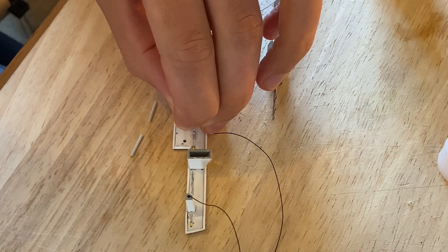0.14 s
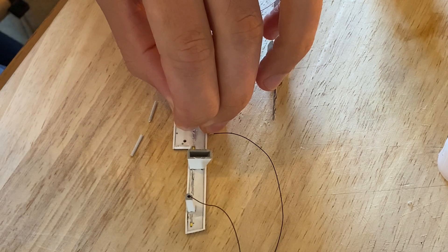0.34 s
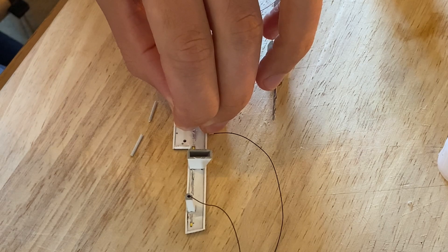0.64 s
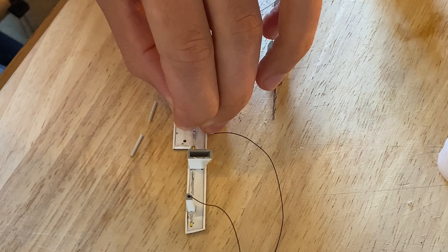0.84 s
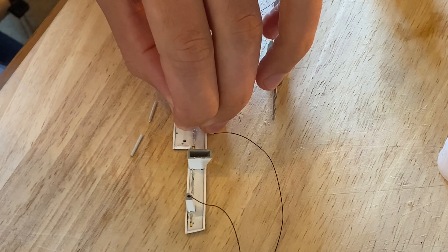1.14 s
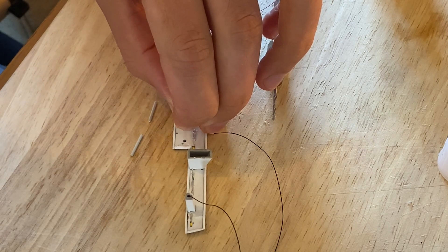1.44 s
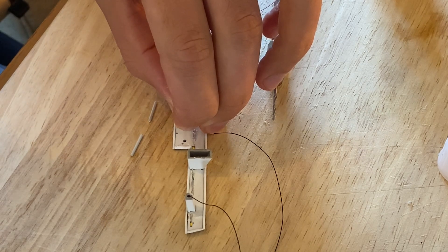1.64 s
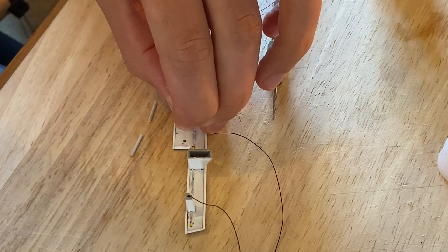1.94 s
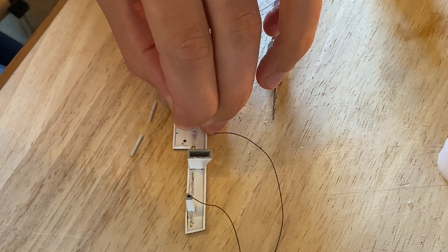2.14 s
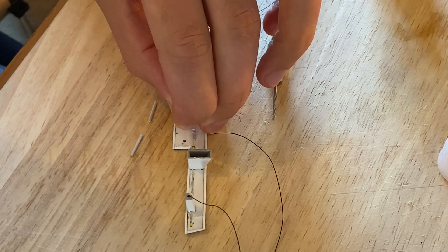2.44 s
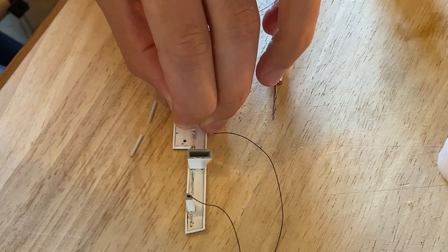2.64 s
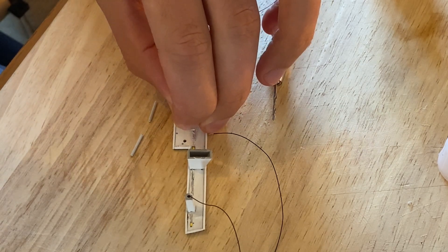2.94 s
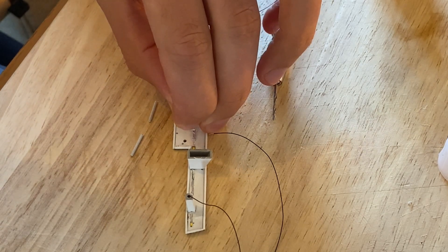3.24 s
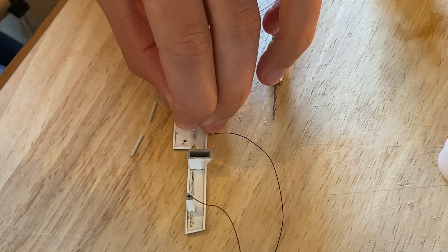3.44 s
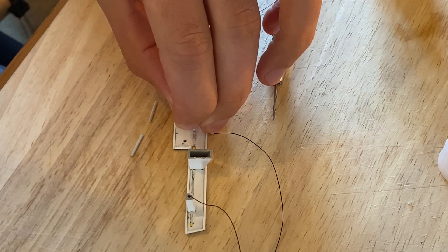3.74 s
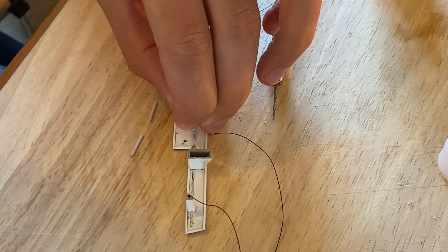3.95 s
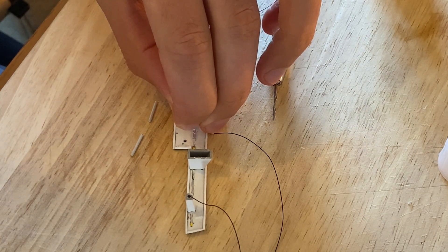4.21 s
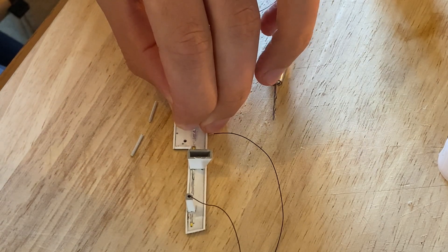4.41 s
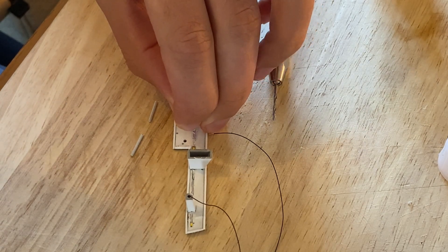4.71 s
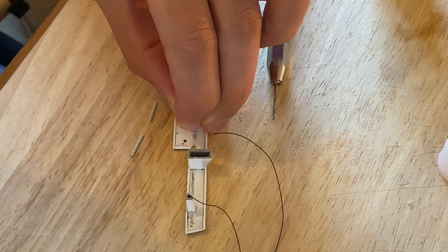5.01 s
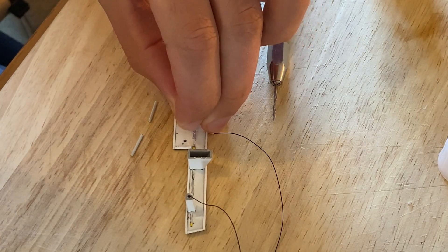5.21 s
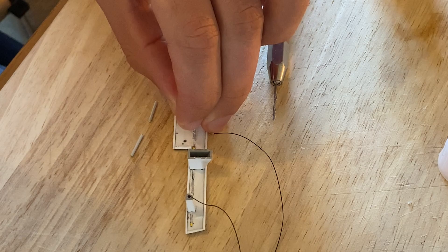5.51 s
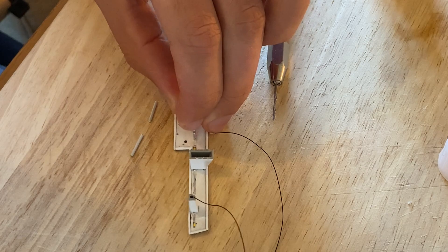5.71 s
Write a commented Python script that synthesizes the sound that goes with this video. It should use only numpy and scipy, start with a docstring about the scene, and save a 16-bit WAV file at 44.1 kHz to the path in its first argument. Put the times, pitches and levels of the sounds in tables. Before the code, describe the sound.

A close stereo microphone hears light finger rustle, a short spurt, a creaky pump stroke and a fuller bright spray, then dry plastic clicks. After a pause, a loud woody thud booms through the table, followed by a weaker dull bump and faint jingling. Slow regular ticking continues in the background of the quiet room, with tiny clicks near the end and a bassy rumble rising outside.

```python
"""A quiet room, close over a wooden table: a pump bottle is handled and squirted, then set down hard.
Fingers, jet and piston are shaped noise; snaps and clicks are short rings with treble flashes. The blows
ring the table's modes under a falling wave front, and small metal parts jingle. Across the room a pendulum
clock ticks through its case. Outdoors a low rumble swells at the end. Two close microphone ports hear it."""
import sys
import numpy as np
from scipy import signal
from scipy.fft import rfft, irfft, next_fast_len
from scipy.io import wavfile

SR = 44100
rng = np.random.default_rng(int(sys.argv[2]) if len(sys.argv) > 2 else 0)


def unload_wav(signal):
    """Save mono or channel-first audio to the path in sys.argv[1] as 16-bit WAV at rate SR, clipped to [-1, 1]."""
    wavfile.write(
        sys.argv[1],
        SR,
        np.round(np.clip(np.atleast_2d(signal).T, -1, 1) * 32767).astype(np.int16),
    )


N = 258867  # samples

# Levels are relative: sources add their own trim. Colours are noise spectra: f/Hz, level/dB per Hz.
# room tone
AIR_COLOUR = [(13, -42), (22, -15), (49, -5.5), (70, -4), (250, -15), (310, -18), (441, -24), (563, -27),
              (737, -30.5), (821, -32), (1080, -34.5), (2230, -40), (6230, -48), (12600, -52), (14000, -68)]
AIR_DB = -64

# fingers sliding on the bottle: start t/s, end t/s, rustle level/dB, growth/dB per s
SLIDES = [(0.126, .168, -63.5, 190), (0.441, .478, -72.5, -30), (0.633, .705, -72, 250),
          (1.636, 1.792, -77, -10), (2.218, 2.31, -85.5, 71)]
SLIDE_COLOUR = [(1760, -61), (3000, -32), (4110, -21), (4430, -18), (6330, -7), (7540, -12.5), (8250, -8.5),
                (10500, -4.5), (11900, -1), (13200, -19.5), (15900, -5.5)]
# resonances of the bottle wall woken by the fingers: f/Hz, width/Hz, level/dB
BOTTLE_WALL = [(6250, 450, -9), (8250, 350, -9), (11850, 350, -5)]
SLIDE_RISE_DB_PER_S, SLIDE_FALL_DB_PER_S = 1400, 752

# clock escapement, across the room: t/s, level/dB
TICKS = [(0.2402, -48.5), (0.8802, -53), (1.4794, -50.5), (2.1052, -52.5), (2.713, -52), (3.3407, -53.5),
         (3.9444, -52.5), (4.572, -55), (5.1767, -52.5), (5.808, -55)]
TICK_COLOUR = [(88, -37.5), (150, 1), (404, -11), (708, -15.5), (766, -26), (1060, -16), (1220, -20.5),
               (1320, -6.5), (1510, -24), (2860, -14.5), (4390, -41), (4930, -25), (8170, -34.5),
               (11100, -19.5), (12800, -31), (15500, -45.5)]
# case resonances on the tick, then on the tock: f/Hz, width/Hz, level/dB
TICK_CASE = [(2240, 240, -4), (2800, 130, -1.5), (6483, 100, -23), (11300, 260, -15)]
TOCK_CASE = [(2100, 300, -9.5), (2585, 300, -0.5), (4990, 300, -22.5), (9660, 190, -7), (11217, 260, -16)]
# decay of the tick in the room: f/Hz, t60/s
TICK_DYING = [(150, 0.31), (800, 0.2), (1800, 0.16), (3600, .2), (6000, 0.12), (12000, .12)]

# squirts: nozzle opens t/s, shuts t/s, hiss level/dB, dribble level/dB
SQUIRTS = [(0.696, 0.746, -51.5, -64.5), (1.143, 1.319, -37, -59)]
JET_COLOUR = [(180, -41), (300, -13.5), (528, -12.5), (634, -1), (773, -4.5), (1690, -12), (1900, -3),
              (2830, -7.5), (3070, -4), (3810, -8.5), (6700, -6.5), (7530, -12.5), (9500, -1.5),
              (11600, -1), (15900, -25)]
OPENING, CLOSING = 0.16, 0.28  # shares of a squirt spent opening and closing
DRIBBLE_S, DRIBBLE_FALL_DB_PER_S = 0.027, 349  # a little still leaves the nozzle afterwards
LEAK_DB = -9.5  # a little mist leaks with the creak

# loud slips of the piston in its barrel: t/s, level/dB
SLIPS = [(0.7017, -42.5), (0.7088, -37), (0.7173, -39.5), (0.734, -40), (0.751, -42), (0.9989, -46),
         (1.03, -45.5), (1.040, -37.5), (1.067, -49), (1.0854, -48.5), (1.126, -51), (1.1366, -35.5)]
SLIP_COLOUR = [(240, -21), (400, -0.5), (825, -2.5), (1700, -13), (2110, 12.5), (2620, -7), (3410, -17.5),
               (3850, -22.5), (4710, 11), (6710, -4), (7590, -13.5), (11500, 4.5), (15900, -21)]
# piston strokes: start t/s, end t/s, creak level/dB, growth/dB per s
STROKES = [(0.703, 0.743, -60.5, 0.5), (0.994, 1.148, -58, 15.5)]
CREAK_COLOUR = [(180, -37), (300, -20.5), (478, -4), (826, 0.5), (2170, -4.5), (3870, -20), (4730, -4.5),
                (6930, -9.5), (7910, -17), (11600, -14), (15900, -22.5)]
STROKE_RISE_DB_PER_S, STROKE_FALL_DB_PER_S = 1402, 900

# small snaps and clicks close by, some from the pump head: t/s, level/dB, ring f/Hz, treble level/dB
SNAPS = [(.774, -43, 950, -76), (0.784, -44.5, 890, -80), (1.346, -38, 2550, -70), (1.35, -38.5, 2750, -65),
         (1.44, -58.5, 4750, -82), (1.567, -40, 2790, -54), (1.848, -44.5, 2690, -54.5),
         (2.299, -69.5, 6200, -70), (4.881, -64.5, 9000, -68.5), (4.885, -66.5, 7030, -62.5),
         (4.898, -60.5, 5070, -54), (4.946, -77.5, 7000, -69), (5.375, -57, 914, -88),
         (5.477, -45.5, 1360, -95)]

# faint table rumble under the moving arm: loudest at t/s, level/dB
HANDLING = [(1.23, -57), (1.46, -58)]
HANDLING_RISE_DB_PER_S, HANDLING_FALL_DB_PER_S = 50, 98.5

# the bottle meets the table: t/s, blow level/dB, low-cut f/Hz, high-cut f/Hz, scatter level/dB,
# crack level/dB, starting f/Hz of the wave front
BLOWS = [(2.789, -16.5, 40, 14000, -11, -33, 1100), (2.9906, -26.5, 230.6, 675, -28, -69, 900)]
# modes of the wooden table: f/Hz, level/dB, t60/s
TABLE_MODES = [(47.53, -28, 0.63), (123.2, -4, 0.35), (169.5, -8.5, 0.42), (211, -9, .15),
               (250.4, -6.5, 0.19), (311.2, -5, 0.14), (351, -10, 0.22), (454.6, -4.5, 0.15),
               (600, -6, 0.1), (734, -14.5, 0.1), (953, -16, 0.1011), (1097, -9, 0.11),
               (1260, -12.5, 0.046), (1424, -17, .08), (1615, -17, 0.078), (2595, -2.5, 0.028),
               (5990, -21, 0.1)]
SCATTER_COLOUR = [(35, -45), (60, -18), (130, -9.5), (346, -11), (539, -20.5), (649, -15), (1110, -23.5),
                  (1370, -17.5), (1500, -18.5), (5960, -40.5), (11500, -58), (15900, -80)]
# decay of the scatter in the room: f/Hz, t60/s
SCATTER_DYING = [(80, 0.57), (210, 0.36), (560, 0.3), (1470, 0.22), (3880, 0.2), (10200, 0.16)]
BENDING_S = 0.003  # delay of a 400 Hz bending wave behind the first arrival
# wave front: time to half pitch, decay, level over the blow
FRONT_FALL_S, FRONT_T60_S, FRONT_DB = 0.0028, 0.034, 19.5

# metal parts shaken by the blows: t/s, jingle level/dB
RATTLES = [(2.996, -83), (3.068, -85), (3.147, -72.5)]
# ringing of the metal: f/Hz, level/dB, t60/s
METAL = [(2796, -13, 0.1), (5060, -1, 0.058), (6150, -10, 0.094), (6300, -8, 0.083), (7400, -12, .05),
         (8140, -7, .08), (10300, -5, 0.046), (11440, -16, 0.083), (12530, -11, .05)]
# one loose part that keeps buzzing: f/Hz, width/Hz, level/dB
LOOSE_PART = [(3860, 250, 0.5)]
RATTLE_RISE_DB_PER_S, RATTLE_FALL_DB_PER_S = 1096, 300
BUZZ_S, BUZZ_DB, BUZZ_FALL_DB_PER_S = 2.92, -72.5, 38

# rumble from outdoors: t/s, bass level/dB
RUMBLE = [(4.9, -77.5), (5.15, -69), (5.25, -59.5), (5.45, -57.5), (5.6, -53), (5.87, -52.5)]
RUMBLE_LOW_COLOUR = [(24, -26.5), (40, -4.5), (118, -2), (145, 1.5), (246, -9), (286, -1), (329, -9.5),
                     (607, -12), (800, -25), (1040, -27), (1760, -120)]
RUMBLE_UPPER_COLOUR = [(290, -34), (500, -29.5), (629, -34.5), (777, -14), (909, -24), (3170, -34),
                       (4500, -50.5), (5850, -77), (9900, -120)]
UPPER_S, UPPER_DB, UPPER_RISE_DB_PER_S = 5.76, -62, 244  # its upper part comes last

# gain of the side signal between the microphone ports: f/Hz, level/dB
WIDTH = [(60, -15.5), (92, -7.5), (140, -12), (210, -11.5), (330, -7), (500, -6), (770, -0.5), (1170, -1),
         (1790, -13.5), (2740, -22), (4190, -13), (6410, 1.5), (9810, 1.5), (15000, -14)]
CUTOFF_HZ = 15900

FLOOR = 1e-18  # inaudible, keeps filter inputs from being exactly zero


def from_db(db):
    """Decibels to gain."""
    return 10 ** (np.asarray(db) / 20)


def rms_one(x):
    """Scale to rms 1."""
    return x / np.sqrt(np.mean(x ** 2) + 1e-20)


def at_hz(points, hz):
    """Read a table on a log-frequency axis."""
    table_hz, values = np.array(points)[:, 0], np.array(points)[:, 1]
    return np.interp(np.log(hz), np.log(table_hz), values)


def gain_curve(rows):
    """A (t/s, level/dB) table as a gain, silent outside the table."""
    s, db = np.transpose(rows)
    return from_db(np.interp(np.arange(N) / SR, s, db, left=-200, right=-200))


def swell(start, stop, db, rise_db_per_s, fall_db_per_s, growth_db_per_s=0):
    """Gain that climbs to db at start, drifts until stop, then falls."""
    t = np.arange(N) / SR
    growth = growth_db_per_s * (np.clip(t, start, stop) - start)
    rise = rise_db_per_s * np.maximum(start - t, 0)
    fall = fall_db_per_s * np.maximum(t - stop, 0)
    return from_db(db + growth - rise - fall)


def clicks(times, db):
    """Single samples at given times."""
    out = np.full(N, FLOOR)
    out[np.round(np.array(times) * SR).astype(int)] = from_db(db)
    return out


def drift(rate):
    """Slow chance: straight lines between random knots of spread 1, two knots per 1/rate seconds."""
    knots = np.arange(0, N / SR + 1 / rate, 0.5 / rate)
    return np.interp(np.arange(N) / SR, knots, rng.standard_normal(len(knots)))


def coloured(spectrum):
    """Steady noise of a given spectrum, rms 1."""
    size = next_fast_len(N, True)
    hz = np.maximum(np.arange(size // 2 + 1) * SR / size, 1)
    white = rfft(rng.standard_normal(size))
    return rms_one(irfft(white * from_db(at_hz(spectrum, hz)), size)[:N])


def fading(hits, t60, rise_s):
    """Envelope of height about 1 per unit click: a short swell, then an exponential fall."""
    lag = np.exp(-1 / (rise_s * SR))
    fall = signal.lfilter([1], [1, -from_db(-60 / (t60 * SR))], hits)
    return signal.lfilter([1 - lag], [1, -lag], fall)


def ring(x, hz, t60):
    """A unit click sets a decaying sine of height 1 ringing."""
    r, w = from_db(-60 / (t60 * SR)), 2 * np.pi * hz / SR
    return signal.lfilter([0, np.sin(w)], [1, -2 * r * np.cos(w), r * r], x)


def resonant_noise(peaks):
    """Noise heard through (f/Hz, width/Hz, level/dB) resonances."""
    out = 0
    for hz, width, db in peaks:
        t60 = np.log(1000) / np.pi / width
        out = out + from_db(db) * rms_one(ring(rng.standard_normal(N), hz, t60))
    return out


def dying_noise(noise, hits, dying, rise_cycles):
    """Octave bands of noise after each hit: lows start later, each band fades at its own pace."""
    out, edges = 0, 40 * 2. ** np.arange(10)
    for low, high in zip(edges, edges[1:]):
        hz = np.sqrt(low * high)
        band = signal.sosfilt(signal.butter(2, [low, high], "band", fs=SR, output="sos"), noise)
        out = out + band * fading(hits, at_hz(dying, hz), 0.00027 + rise_cycles / hz)
    return out


def room_tone():
    """Steady noise of the quiet room, wavering slowly in level."""
    return from_db(AIR_DB + 1.2 * drift(6)) * coloured(AIR_COLOUR)


def fingers():
    """Skin sliding on the bottle rustles and wakes resonances of its wall."""
    slide = sum(swell(a, b, db, SLIDE_RISE_DB_PER_S, SLIDE_FALL_DB_PER_S, growth)
                for a, b, db, growth in SLIDES)
    rustle = from_db(-3) * coloured(SLIDE_COLOUR) + resonant_noise(BOTTLE_WALL)
    return slide * rustle * from_db(1.3 * drift(120))


def clock():
    """Far ticks arrive mostly as room sound, through case resonances that differ from tick to tock."""
    s, db = np.transpose(TICKS)
    tock = np.searchsorted(s, np.arange(N) / SR, "right") % 2 == 0
    case = np.where(tock, resonant_noise(TOCK_CASE), resonant_noise(TICK_CASE))
    return dying_noise(coloured(TICK_COLOUR) + case, clicks(s, db + 1), TICK_DYING, rise_cycles=6.1)


def stroke_gain():
    """Level of the piston's creak."""
    return sum(swell(a, b, db, STROKE_RISE_DB_PER_S, STROKE_FALL_DB_PER_S, growth)
               for a, b, db, growth in STROKES)


def jet():
    """Liquid forced through the nozzle: smooth bright noise that sputters a little."""
    t = np.arange(N) / SR
    flow = from_db(LEAK_DB) * stroke_gain()
    for a, b, db, dribble_db in SQUIRTS:
        opening = np.minimum((t - a) / OPENING, (b - t) / CLOSING) / (b - a)
        flow = flow + from_db(db) * np.clip(opening, 0, 1)
        flow = flow + (t > a) * swell(a, b + DRIBBLE_S, dribble_db, 0, DRIBBLE_FALL_DB_PER_S)
    return flow * coloured(JET_COLOUR) * from_db(1.2 * drift(120))


def piston():
    """The piston slips in its barrel: loud puffs of noise a few ms long over a creak of many small ones."""
    s, db = np.transpose(SLIPS)
    slips = coloured(SLIP_COLOUR) * fading(clicks(s, db), 0.014, 0.0005)
    creak = stroke_gain()
    small = (rng.random(N) < 300 / SR) * rng.exponential(1, N) * creak  # about 300 per second
    grain = from_db(1.5) * fading(small + FLOOR, 0.0051, 0.00036)
    return slips + coloured(CREAK_COLOUR) * (grain + from_db(-7.5) * creak)


def snaps():
    """Each snap or click is a short ring with a flash in the treble."""
    out = np.zeros(N)
    bright, broad = coloured(SLIDE_COLOUR), coloured(CREAK_COLOUR)
    hit = np.append(1., np.full(SR // 4, FLOOR))
    for s, db, hz, treble_db in SNAPS:
        span = slice(round(s * SR), round(s * SR) + len(hit))
        knock = ring(hit, hz, 0.018)
        knock += from_db(-9.5) * ring(hit, 1.64 * hz, 0.013)
        knock += from_db(-17.5) * ring(hit, 0.52 * hz, 0.0092)
        knock += 0.26 * broad[span] * fading(hit, 0.0061, 0.00024)
        echo = from_db(-5.5) * rng.standard_normal(len(hit)) * fading(hit, 0.2, 0.00079)
        knock += 0.13 * ring(echo, hz, 0.00213)
        flash = fading(hit, 0.012, 0.00082) + from_db(-20.0) * fading(hit, 0.11, 0.0023)
        out[span] += from_db(db - 3.5) * knock + from_db(treble_db + 0.5) * bright[span] * flash
    return out


def arm_on_table(low):
    """The table rumbles faintly under the moving arm: bass noise, low-passed."""
    arm = sum(swell(s, s, db, HANDLING_RISE_DB_PER_S, HANDLING_FALL_DB_PER_S) for s, db in HANDLING)
    return arm * signal.lfilter(*signal.butter(2, 300, fs=SR), low)


def wave_front(s, db, front_hz):
    """A bending wave spreads highs first, so its front falls in pitch."""
    t = np.maximum(np.arange(N) / SR - s, 0)
    falling = np.sin(2 * np.pi * front_hz * FRONT_FALL_S * np.log(1 + t / FRONT_FALL_S))
    return from_db(db + FRONT_DB - 60 * t / FRONT_T60_S) * (1 - np.exp(-t / 0.0038)) * falling


def set_down():
    """Each blow sends out a wave front and sets the table modes ringing; the room scatters it."""
    out, bright = 0, coloured(SLIDE_COLOUR)
    for s, db, soft_hz, hard_hz, scatter_db, crack_db, front_hz in BLOWS:
        scatter = dying_noise(coloured(SCATTER_COLOUR), clicks([s], scatter_db), SCATTER_DYING,
                              rise_cycles=0.87)
        body = wave_front(s, db, front_hz)
        for k, (hz, level_db, t60) in enumerate(TABLE_MODES):
            arrival = clicks([s + BENDING_S * np.sqrt(400 / hz)], db + level_db)
            build_up = ring(arrival, hz, 6.0 / hz) * 3 * hz / SR  # over a cycle or two
            body = body + (-1) ** k * ring(build_up, hz, t60)
        contact = signal.butter(1, hard_hz, fs=SR)  # a soft blow hardly wakes the high modes
        body = signal.lfilter(*contact, signal.lfilter(*contact, body) + scatter)
        out = out + signal.sosfilt(signal.butter(4, soft_hz, "high", fs=SR, output="sos"), body)
        crack = fading(clicks([s], crack_db), 0.025, 0.00038)
        crack += fading(clicks([s], crack_db - 15), 0.079, 0.0029)
        out = out + bright * crack
    s, db = BLOWS[0][:2]
    # the room keeps the bass of the first blow longest
    return out + coloured(RUMBLE_LOW_COLOUR) * fading(clicks([s], db - 24.5), 0.95, 0.02)


def jingle():
    """Tiny uneven contacts: a dry rattle, the ringing of the metal and one buzzing loose part."""
    shake = sum(swell(s, s, db, RATTLE_RISE_DB_PER_S, RATTLE_FALL_DB_PER_S) for s, db in RATTLES)
    rings = 0
    for hz, db, t60 in METAL:
        touches = (rng.random(N) < 500 / SR) * rng.standard_normal(N) * shake  # about 500 per second
        rings = rings + from_db(db + 2.5) * ring(touches + FLOOR, hz, t60)
    buzz = swell(BUZZ_S, BUZZ_S, BUZZ_DB, RATTLE_RISE_DB_PER_S, BUZZ_FALL_DB_PER_S)
    rattle = from_db(9) * shake * coloured(SLIDE_COLOUR)
    return rings + buzz * resonant_noise(LOOSE_PART) + rattle


def outdoor_rumble(low):
    """Bass noise from outdoors swells, and its upper part follows."""
    upper = swell(UPPER_S, N / SR, UPPER_DB, UPPER_RISE_DB_PER_S, 0) * coloured(RUMBLE_UPPER_COLOUR)
    return gain_curve(RUMBLE) * low + upper


def background():
    """Room tone plus both rumbles, which share one bass noise and one waver."""
    low = coloured(RUMBLE_LOW_COLOUR)
    rumble = arm_on_table(low) + outdoor_rumble(low)
    return room_tone() + rumble * from_db(0.83 * drift(9.3))


def scene():
    """Two close microphone ports: the side is a phase-turned copy, a diffuse part and its own background."""
    near = fingers() + clock() + jet() + piston() + snaps() + set_down() + jingle()
    mid = near + background()
    size = next_fast_len(N + SR // 4)
    hz = np.maximum(np.arange(size // 2 + 1) * SR / size, 1)
    smear = rng.standard_normal(SR // 8) * from_db(-60 * np.arange(SR // 8) / SR / 0.091)
    diffuse = rfft(smear / np.linalg.norm(smear), size)
    turn = 0.6 * 1j + 0.4 * diffuse  # 1j turns the phase a quarter cycle
    spectrum = rfft(near, size) * turn + 0.9 * rfft(background(), size)
    side = irfft(spectrum * from_db(at_hz(WIDTH, hz)), size)[:N]
    return np.array([mid + side, mid - side])


def record(dry):
    """The top is cut steeply."""
    return signal.sosfilt(signal.cheby2(14, 60, CUTOFF_HZ, fs=SR, output="sos"), dry)


dry = scene()
out = record(dry)
unload_wav(out)
```